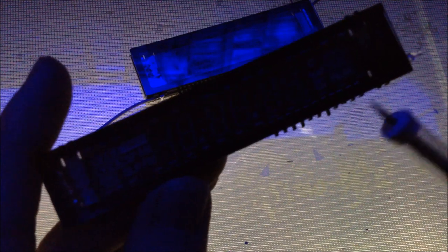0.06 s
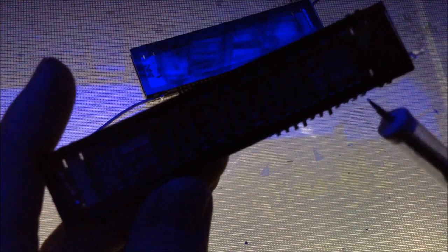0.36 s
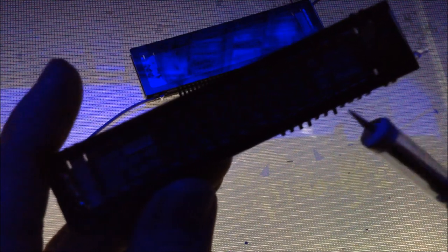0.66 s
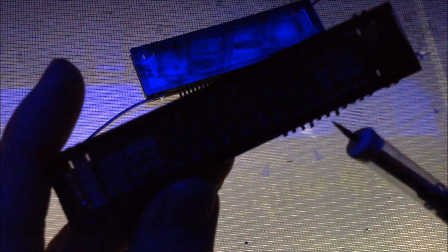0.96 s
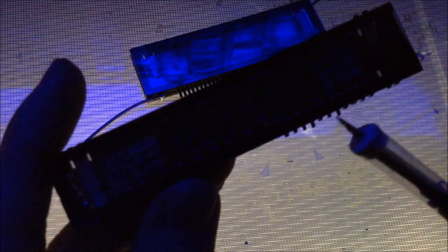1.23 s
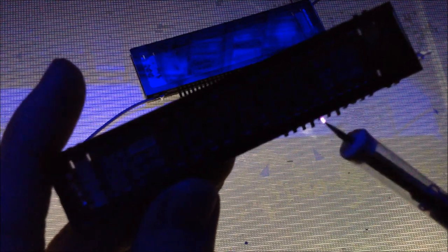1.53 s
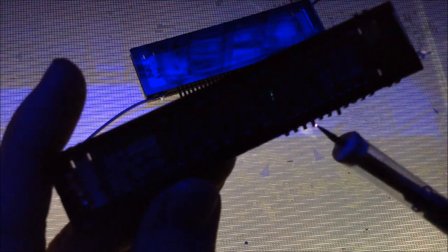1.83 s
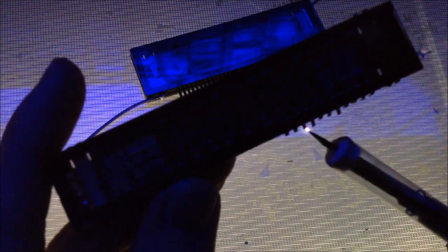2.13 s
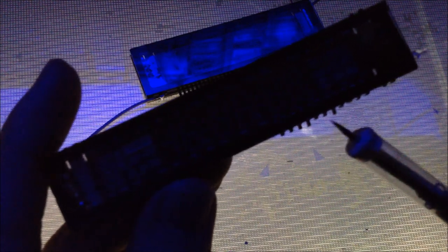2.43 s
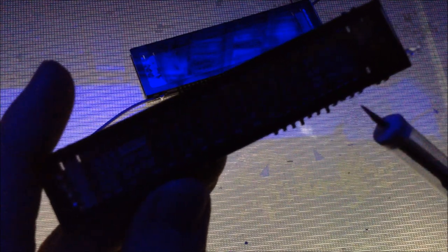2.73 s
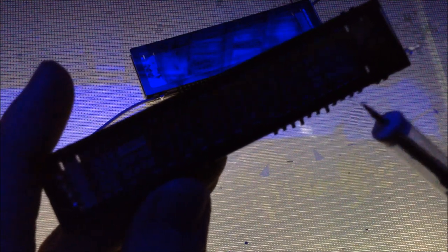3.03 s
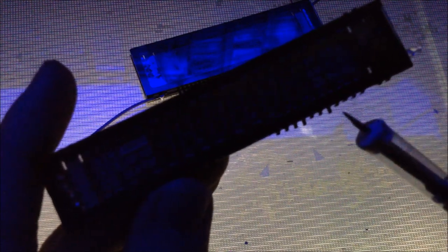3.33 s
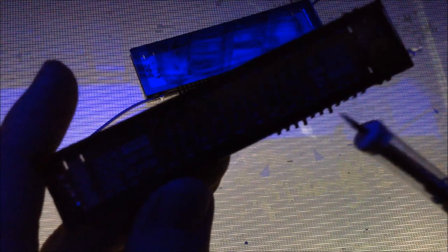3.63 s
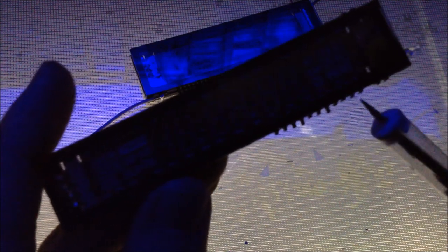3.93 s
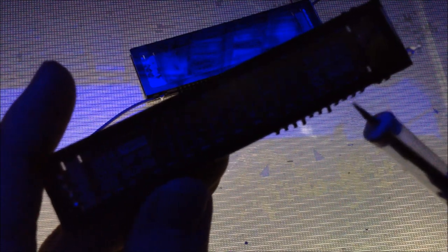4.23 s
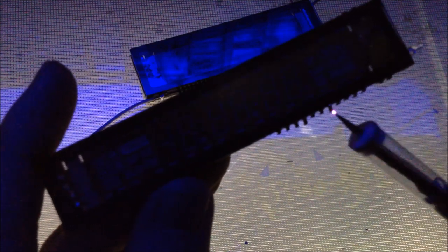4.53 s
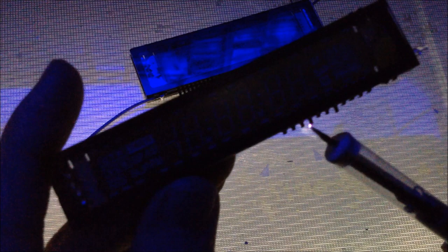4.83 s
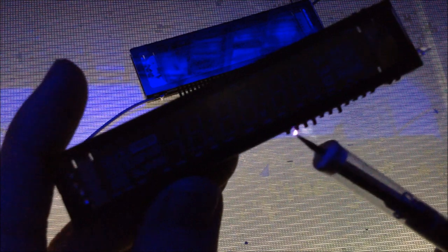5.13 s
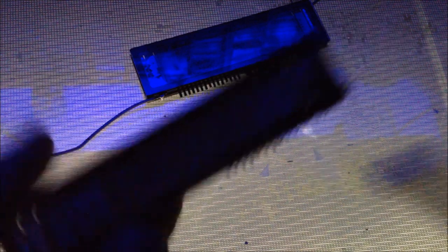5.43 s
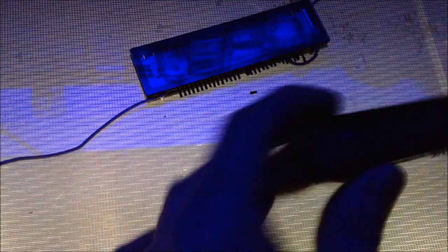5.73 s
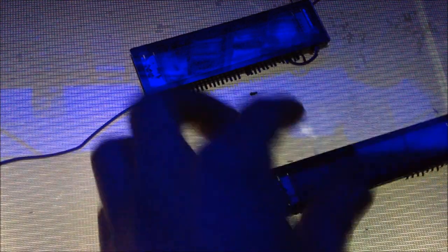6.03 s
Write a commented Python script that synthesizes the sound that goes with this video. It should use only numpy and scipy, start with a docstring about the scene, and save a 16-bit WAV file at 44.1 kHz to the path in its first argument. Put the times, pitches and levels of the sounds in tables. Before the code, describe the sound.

Close to the microphone in a quiet room, fingers shift softly on a glass display tube. A high-voltage probe sparks at its pins in soft, short hisses and sputters, gives a faint high whistle while it hovers, then sparks again. At the end the tube is set down on a table with two loud knocks and a glassy clink. A small motor hums faintly throughout.

```python
"""A high-voltage spark probe on the pins of a glass display tube, close to the microphone in a quiet room.
In free air its corona pulses whistle; near a pin they slow to a sputter; when the arc strikes, its tiny
sparks merge into a hiss. Fingers shift on the tube, and a small motor hums nearby. At the end the tube
is set down: it knocks on the table twice and its glass clinks. Everything sits dead centre."""
import sys
import numpy as np
from scipy import signal
from scipy.fft import rfft, irfft, next_fast_len
from scipy.io import wavfile

SR = 44100
rng = np.random.default_rng(int(sys.argv[2]) if len(sys.argv) > 2 else 0)


def master(y):
    """Save y as 16-bit WAV."""
    cut = np.clip(np.atleast_2d(y).T, -1, 1)
    pcm = np.round(cut * 32767)  # scale
    wavfile.write(sys.argv[1], SR, pcm.astype(np.int16))


N = 272097
T = np.arange(N) / SR

# Arcs between tip and pin. Each row: start and length in seconds, relative level in dB,
# seconds to rise 20 dB, seconds to fade 20 dB.
ARC_STRIKES = [(1.485, .11, -66, .02, .02), (1.614, .07, -46.3, .02, .02), (1.744, .07, -47.6, .003, .045),
               (2.191, .07, -54, .02, .025), (2.349, .113, -46, .035, .02), (2.592, .003, -49, .002, .004),
               (2.605, .002, -47, .002, .003), (2.613, .003, -51, .002, .006),
               (4.338, .011, -47, .004, .03), (4.368, .004, -51, .01, .011),
               (4.391, .022, -48.5, .013, .007), (4.468, .084, -47, .006, .045),
               (4.598, .056, -50.3, .025, .05), (4.674, .18, -48, .07, .04), (4.988, .032, -55, .1, .1),
               (5.085, .062, -45, .06, .06), (5.16, .072, -48.3, .02, .02), (5.243, .013, -45, .03, .013)]
# The arc's hiss. Each row: frequency in Hz, relative spectral level in dB.
ARC_SPECTRUM = [(410, -65), (700, -18.5), (1060, -25), (1420, -2), (1530, -7), (2590, -3), (3220, -8.5),
                (4060, -2.5), (5960, -4), (6430, 1.5), (7320, -5), (8750, 0), (15000, -3.5)]
# Peaks and dips that nearby surfaces give the arc. Each row: centre and width in Hz, gain in dB.
ARC_REFLECTIONS = [(2580, 67, 7), (2920, 72, -7.5), (4950, 320, -2), (5480, 130, 3.5), (6000, 130, -3),
                   (6200, 170, 1.5), (8160, 170, -0.5), (8850, 250, -1), (9570, 230, -9), (11430, 200, 2),
                   (11530, 200, -4.5), (12900, 110, 2)]
# The corona while the tip hovers clear of the pins. Each row: time in seconds, free pulse rate in Hz.
HOVER_RATES = [(2.68, 4436), (3.0, 4415), (3.3, 4402), (3.45, 4492), (3.62, 4537), (3.8, 4471),
               (4.02, 4506), (4.15, 4567), (4.29, 4564)]
# Short whistles from pin to pin. Each row: start and length in seconds, relative level in dB,
# first, middle and last free pulse rate in Hz, unsteadiness from 0 to 1.
WHISTLES = [(1.508, .092, -64, 4600, 4250, 3950, .65), (1.852, .175, -69.5, 4800, 4150, 4600, .95),
            (2.05, .115, -68, 4100, 4120, 4950, .62), (2.275, .058, -68.5, 4650, 4200, 4950, .9),
            (4.88, .072, -71, 4740, 4150, 5050, .92), (5.29, .085, -62.5, 4330, 4170, 4230, .96)]
# Sputter near a pin. Each row: start and length in seconds, level in dB, peak frequency in Hz.
PIN_SPUTTERS = [(1.545, .07, -64, 3750), (1.884, 0.076, -58.5, 3350), (1.949, 0.06, -56, 3450),
                (2.037, 0.043, -56, 3420), (2.108, 0.027, -59.5, 3160), (2.296, 0.016, -57.5, 3300),
                (2.6, .14, -65, 3660), (2.738, 0.17, -69.5, 3700), (4.889, 0.033, -57.5, 3300),
                (5.28, 0.1, -66.5, 3910)]
# Faint, narrow tones. Each row: start and length in seconds, level in dB, pitch in Hz.
THIN_TONES = [(2.21, .05, -68, 2690), (2.49, .07, -74, 2770)]
# Knocks of the tube. Each row: start in seconds, relative table and glass levels in dB,
# hardness as a low-pass corner in Hz.
CONTACTS = [(.7035, -77, -51, 9000), (.751, -48, -49.5, 5060), (5.554, -52, -51, 6000),
            (5.702, -52, -66, 7050), (5.8758, -57, -50, 9000), (5.8846, -5.8, -18.5, 4400),
            (5.934, -23, -29, 5000), (5.952, -41, -39, 5000), (6.043, -41, -37, 7000),
            (6.0467, -32, -29, 7100), (6.0723, -24.5, -34, 2970), (6.0819, -11, -4.5, 14000),
            (6.104, -24, -18.5, 8000), (6.113, -28, -31, 3000), (6.1184, -20.5, -10.5, 14000),
            (6.132, -27, -23.5, 9000)]
# Modes of the table top, the glass with its pins, and the tube damped by the hand.
# Each row: frequency in Hz, relative level in dB, seconds to fade 60 dB.
TABLE_MODES = [(263, -29, .15), (335, -17, 0.072), (654, -18, 0.13), (800, -20, 0.06), (1153, -5.5, 0.076),
               (1455, -19, 0.12), (1617, -6.5, 0.068), (1882, 3, 0.033), (2180, 1, 0.044),
               (2478, -3, 0.037), (2800, -30, 0.049), (3340, -8, 0.071), (3887, -25, 0.083),
               (4570, -19, .1), (4670, -19, .085), (6309, -27, .09)]
GLASS_MODES = [(1642, -3.5, 0.061), (2540, -3, 0.047), (2900, -4, 0.046), (3325, -12, .1),
               (3420, -9.5, 0.12), (3840, -2, 0.046), (4466, 5, 0.018), (4670, -0.5, 0.05),
               (5680, -1, 0.022), (6085, 0.5, .035), (6400, -16, 0.044), (6800, -8, 0.044), (6980, -8, .06),
               (8100, -14, .07), (8700, -2, 0.095), (15000, -1, .065), (15010, -9, .09)]
HELD_MODES = [(250, -11, 0.077), (343, -15, 0.073), (545, -10, .04), (880, -9.5, 0.031), (1765, 4.5, 0.011),
              (1930, -16, .015), (3960, -10, 0.0083)]
# The crack of table and of glass. Each row: frequency in Hz, relative spectral level in dB.
KNOCK_SPECTRUM = [(50, -48), (110, -31), (250, -12.5), (600, -21), (1050, -4), (2100, -1.5), (3200, -4.5),
                  (4700, -5.5), (6200, -14), (7500, -36), (10000, -13.5), (15000, -43)]
CLINK_SPECTRUM = [(100, -45), (400, -30), (1100, -9), (1650, -4.5), (2300, -10), (3400, -6), (4500, 1),
                  (5100, -12), (6200, 0), (7500, -11), (8600, -3.5), (11300, -18.5), (13500, -11.5),
                  (15000, -6.5)]
# The grip shifts in small jolts. Each row: start in seconds, relative level in dB.
GRIP_JOLTS = [(0.7328, -49), (0.7407, -39), (0.7535, -54), (0.8378, -51)]
# Fingers creep along the tube. Each row: start and length in seconds, level in dB.
FINGER_CREEPS = [(.755, .015, -58), (.8, .11, -64), (.932, .025, -59.5)]
# Fingers and tube slide. Each row: start and length in seconds, relative level in dB, centre in Hz.
SLIDES = [(5.516, 0.085, -63.5, 392), (5.528, 0.053, -62.5, 4000), (5.693, 0.037, -60.5, 3530),
          (6.005, 0.06, -59, 1900)]
# The room's short decay. Each row: frequency in Hz, seconds to fade 60 dB.
ROOM_DECAY = [(150, 0.31), (500, 0.31), (1500, 0.13), (4000, 0.17), (9000, 0.12), (15000, 0.2)]
# The nearby motor. Each row: frequency in Hz, rms level in dB.
MOTOR_LINES = [(120.7, -88), (181.2, -62), (241.6, -77), (1147, -81.5), (1448, -65), (1933, -84.5),
               (3620, -81)]
# Still air and microphone hiss. Each row: frequency in Hz, relative spectral level in dB.
AIR_SPECTRUM = [(25, -24), (60, -13), (110, -6), (170, 1.5), (280, -3), (450, -8), (900, -10), (2000, -12),
                (3500, -13), (5500, -19), (9000, -21), (13700, -23), (14600, -30)]

SUPPLY_HZ = 18298  # the probe's ultrasonic supply
HOVER_START_S, HOVER_LENGTH_S = 2.625, 1.84
WHISTLE_RISE_S, WHISTLE_FADE_S = .012, .025  # per 20 dB


def arc(level_db=3, flicker_db=.94):
    """Thousands of tiny sparks a second merge into a bright, flickering hiss."""
    def colour(f):
        ripple = sum(db * np.exp(-.5 * ((f - hz) / width) ** 2) for hz, width, db in ARC_REFLECTIONS)
        return read(ARC_SPECTRUM, f) + ripple
    hiss = spark_strength() * amp(level_db + flicker_db * drift(160)) * noise(colour, N)
    return bench_echoes(hiss, db=-8, t60=.035)


def spark_strength(hover_db=-76, whistle_db=-72, below_sputter_db=4.5, sag_db=1.7):
    """Gain of the arcs, over the faint sparking that goes with whistles and sputters."""
    faint = [(HOVER_START_S, HOVER_LENGTH_S, hover_db)]
    faint += [(s, length, whistle_db) for s, length, *_ in WHISTLES]
    faint += [(s, length, db - below_sputter_db) for s, length, db, _ in PIN_SPUTTERS]
    gain = np.max([amp(db) * envelope(s, length) for s, length, db in faint], axis=0)
    for s, length, db, rise_s, fade_s in ARC_STRIKES:
        sag = sag_db * np.sin(np.pi * progress(s, length))  # loudest on striking and before breaking
        gain = np.maximum(gain, amp(db - sag) * envelope(s, length, rise_s, fade_s))
    return gain


def corona(wander_hz=25, reach_hz=380):
    """Corona pulses whistle at their own rate and at their beat with the ultrasonic supply."""
    rate, gain, unsteady = corona_state()
    rough = np.clip(unsteady, 0, 1) ** 2
    near_lock = np.exp(-((rate - SUPPLY_HZ / 4) / reach_hz) ** 2)  # middle tones fade as the rate strays
    rate = rate + wander_hz * rough * drift(25.3)

    def line(hz, width_hz):
        """Pure when locked, then fuzzy, then a broad band."""
        pure = (1 - rough) ** 2 * np.sqrt(2) * np.sin(phase(hz))
        blur = np.sqrt(2 * rough * (1 - rough))
        return pure + blur * fuzzy(hz, width_hz / 4) + rough * fuzzy(hz, width_hz)
    fundamental = amp(-1.5 - 5.5 * rough) * line(rate, 190)
    half_supply = near_lock * amp(-2.5) * line(SUPPLY_HZ / 2 - 150 * rough ** 2, 350)
    beat = amp(-3 + 9 * rough ** .25) * line(SUPPLY_HZ - rate, 115)
    # late pulses spread skirts under the beat and the fundamental
    high_skirt = rough ** .25 * amp(-3) * fuzzy(12800, 800)
    low_skirt = rough * amp(-5) * fuzzy(rate - 550, 460)
    side_tone = near_lock * amp(-9.5) * fuzzy(8331, 30)
    return gain * (fundamental + half_supply + beat + high_skirt + low_skirt + side_tone)


def corona_state(hover_db=-66, hover_unsteady=.95, lock_hz=55, lock_gain_db=1.5, duck_db=-6):
    """Rate, gain and unsteadiness of the corona as the tip hovers or moves from pin to pin."""
    rate = np.interp(T, *np.transpose(HOVER_RATES))
    gain = amp(hover_db) * envelope(HOVER_START_S, HOVER_LENGTH_S)
    unsteady = hover_unsteady
    for s, length, db, first_hz, middle_hz, last_hz, glide_unsteady in WHISTLES:
        glide = amp(db) * envelope(s, length)
        arch = np.polyfit([0, .5, 1], [first_hz, middle_hz, last_hz], 2)
        rate = np.where(glide > gain, np.polyval(arch, progress(s, length)), rate)
        unsteady = np.where(glide > gain, glide_unsteady, unsteady)
        gain = np.maximum(glide, gain)
    rasp = sum(amp(db) * envelope(s, length, fade_s=WHISTLE_RISE_S) for s, length, db, _ in PIN_SPUTTERS)
    broken = rasp ** 4 / (rasp ** 4 + (2 * gain) ** 4)  # a strong sputter breaks the whistle
    # near a quarter of the supply frequency the pulses lock, steady and grow louder
    off_hz = rate - SUPPLY_HZ / 4
    lock = 1 / (1 + (off_hz / lock_hz) ** 2)
    gain = gain * amp(lock_gain_db * lock + duck_db * broken)
    return rate - lock * off_hz, gain, unsteady * (1 - lock)


def sputter(flicker_db=1.7):
    """Slow, uneven corona pulses: short rasps with one broad peak and its octave."""
    peak_multiples = [.45, .76, .93, 1.07, 1.27, 1.85, 2.2, 4.4]
    colour_db = [-18, -9, 3.5, 3, -7.5, -5.5, -19, -24]
    out = np.zeros(N)
    for s, length, db, hz in PIN_SPUTTERS:
        size = round(length * SR)
        rasp = noise(lambda f: np.interp(f / hz, peak_multiples, colour_db), SR)[:size]
        add(out, s, amp(db) * rasp * signal.windows.tukey(size, .35))
    return out * amp(flicker_db * drift(150))


def thin_tones(octave_db=-5):
    """Two faint, brief, narrow tones near 2.7 kHz, each with its octave."""
    out = np.zeros(N)
    for s, length, db, hz in THIN_TONES:
        tone = fuzzy(hz, 11) + amp(octave_db) * fuzzy(2 * hz, 28)
        out += amp(db) * envelope(s, length, rise_s=.025, fade_s=.025) * tone
    return out


def tube_knocks():
    """Each contact rings table and glass; a soft contact loses its treble."""
    out = np.zeros(N)
    for s, knock_db, clink_db, corner_hz in CONTACTS:
        knock = struck(TABLE_MODES, KNOCK_SPECTRUM, ring_db=-13.5, crack_db=-7, t60=.04, room_db=-23)
        clink = struck(GLASS_MODES, CLINK_SPECTRUM, ring_db=-14, crack_db=-4, t60=.028, room_db=-24.5)
        softness = signal.butter(2, corner_hz, fs=SR)
        add(out, s, signal.lfilter(*softness, amp(knock_db) * knock + amp(clink_db) * clink))
    return out


def struck(modes, spectrum, ring_db, crack_db, t60, room_db):
    """One blow: ringing modes, a crack of dense modes that dies in t60 seconds, and the room's answer."""
    t = np.arange(SR // 2) / SR
    crack = noise(lambda f: read(spectrum, f), len(t)) * amp(-60 * t / t60)
    return amp(ring_db) * ring(modes) + amp(crack_db) * crack + amp(room_db) * room_tail(spectrum, t)


def grip(slips_per_s=900):
    """Jolts and tiny slips of the fingers excite the held tube."""
    body = ring(HELD_MODES)
    slips = rng.standard_normal(N) * (rng.random(N) < slips_per_s / SR)
    creeps = [amp(db) * envelope(s, length, rise_s=.025, fade_s=.06) for s, length, db in FINGER_CREEPS]
    out = unit_rms(signal.oaconvolve(slips, body)[:N]) * np.max(creeps, axis=0)
    for s, db in GRIP_JOLTS:
        add(out, s, amp(db) * body)
    return out


def rubs(grain_db=3):
    """Fingers and tube slide in short, grainy rubs."""
    out = np.zeros(N)
    for s, length, db, hz in SLIDES:
        size = round(length * SR)
        slide = noise(lambda f: -5 * np.log2((f + 1) / hz) ** 2, SR)[:size]
        add(out, s, amp(db) * slide * signal.windows.tukey(size, .5))
    return out * amp(grain_db * (drift(200) - .5))


def bench_echoes(x, db, t60):
    """Things on the bench throw back many early echoes, which comb the spectrum finely."""
    t = np.arange(SR // 30) / SR
    taps = rng.standard_normal(len(t)) * (rng.random(len(t)) < .1)
    taps *= (t > .001) * amp(-60 * t / t60)
    echoes = signal.oaconvolve(x, taps / np.linalg.norm(taps))[:len(x)]
    return (x + amp(db) * echoes) / np.sqrt(1 + amp(2 * db))


def room_tail(spectrum, t, build_s=.0072):
    """The room answers a blow with a quick swell of noise whose bass lingers longest."""
    hz, times, bands = signal.stft(noise(lambda f: read(spectrum, f), len(t)), SR, nperseg=256)
    decay = amp(-60 * times / read(ROOM_DECAY, hz)[:, None])
    tail = signal.istft(bands * decay, SR, nperseg=256)[1][:len(t)]
    return tail * (1 - np.exp(-t / build_s))


def motor(waver=.1, sway_rad=.12):
    """A small motor nearby hums in slightly wavering lines."""
    out = np.zeros(N)
    for hz, db in MOTOR_LINES:
        tone = np.sqrt(2) * np.sin(2 * np.pi * hz * T + sway_rad * drift(2))
        out += amp(db) * tone * (1 + waver * drift(11))
    return out


def room_tone(level_db=-65.5):
    """Still air and the microphone's own hiss."""
    return amp(level_db) * noise(lambda f: read(AIR_SPECTRUM, f), N)


def ring(modes):
    """Free decay of a set of modes after a sharp push."""
    t = np.arange(SR // 2) / SR
    return sum((-1) ** k * amp(db - 60 * t / t60) * np.sin(2 * np.pi * hz * t)
               for k, (hz, db, t60) in enumerate(modes))


def fuzzy(hz, width_hz):
    """A whistle smeared over a width around its pitch."""
    smear = drift(width_hz) + 1j * drift(width_hz)
    return unit_rms((smear * np.exp(1j * phase(hz))).real)


def phase(hz):
    """Running phase of a steady or moving pitch."""
    return 2 * np.pi * np.cumsum(hz * np.ones(N)) / SR


def drift(hz):
    """Random wander of rms 1, mostly slower than hz."""
    return noise(lambda f: -10 * np.log10(1 + (f / hz) ** 4), N)


def noise(shape_db, size):
    """Noise of rms 1 whose spectrum is a function of frequency."""
    padded = next_fast_len(size, True)
    hz = np.fft.rfftfreq(padded, 1 / SR)
    shaped = rfft(rng.standard_normal(padded)) * amp(shape_db(hz))
    return unit_rms(irfft(shaped, padded)[:size])


def envelope(start, length, rise_s=WHISTLE_RISE_S, fade_s=WHISTLE_FADE_S):
    """Attack, hold and release; rise and fade are the times for 20 dB."""
    outside = np.maximum((start - T) / rise_s, (T - start - length) / fade_s)
    return amp(-20 * np.clip(outside, 0, 10))


def progress(start, length):
    """Runs from 0 to 1 during an event."""
    return np.clip((T - start) / length, 0, 1)


def read(points, hz):
    """Reads a curve on a log-frequency axis."""
    f, value = np.transpose(points)
    return np.interp(np.log(hz + 1), np.log(f + 1), value)


def add(mix, s, sound):
    """Mixes a sound in at s seconds."""
    part = mix[round(s * SR):][:len(sound)]
    part += sound[:len(part)]


def amp(db):
    """Decibels to gain."""
    return 10 ** (np.asarray(db) / 20)


def unit_rms(x):
    """Scales to rms 1."""
    return x / np.sqrt(np.mean(x ** 2) + 1e-20)


def scene(low_cut_hz=150):
    """Probe and tube are close and straight ahead; the knocks, slides and grip on the tube carry little bass."""
    low_cut = signal.butter(3, low_cut_hz, "high", fs=SR)
    handling = signal.lfilter(*low_cut, grip() + rubs() + tube_knocks())
    background = motor() + room_tone()
    mix = arc() + corona() + thin_tones() + sputter() + handling + background
    return np.array([mix, mix])


def record(dry, edge_hz=15400):
    """The recorder rounds off the loudest peaks just under full scale, then cuts the top treble."""
    rounded = dry / (1 + dry ** 6) ** (1 / 6)
    band_limit = signal.firwin(511, edge_hz, window=("kaiser", 9), fs=SR)
    return signal.oaconvolve(rounded, band_limit[None], "same")


dry = scene()
out = record(dry)
master(out)
```